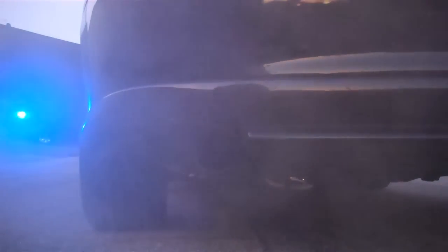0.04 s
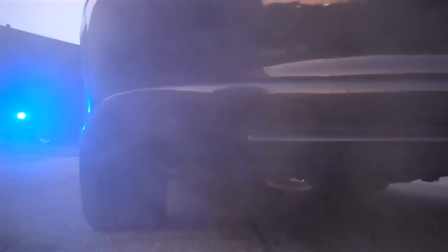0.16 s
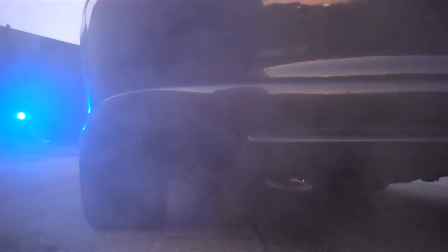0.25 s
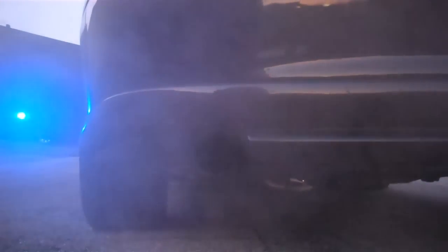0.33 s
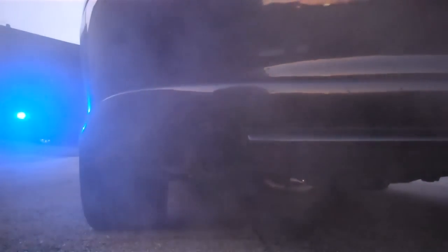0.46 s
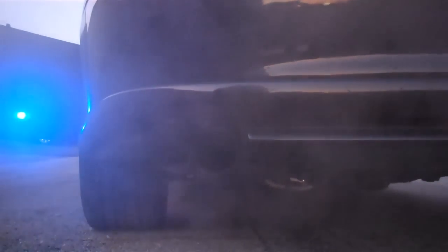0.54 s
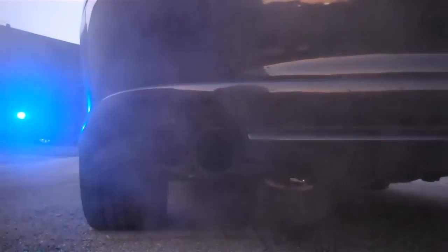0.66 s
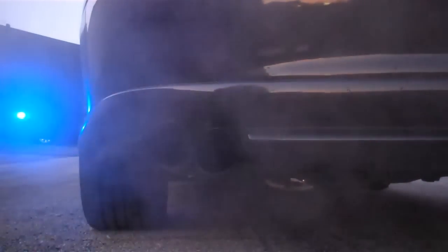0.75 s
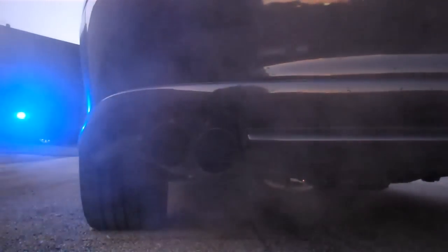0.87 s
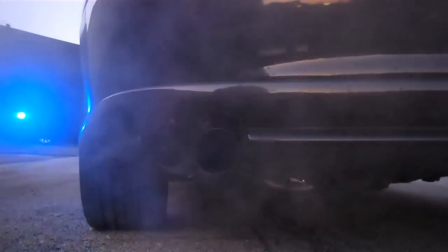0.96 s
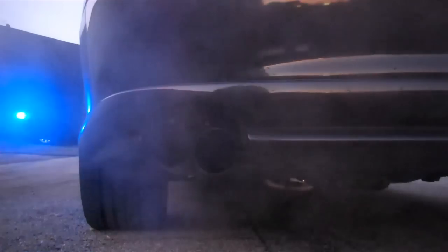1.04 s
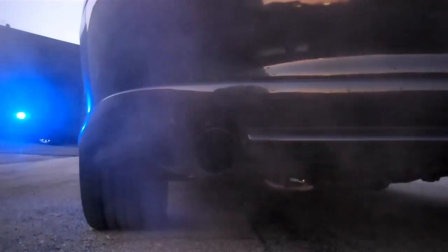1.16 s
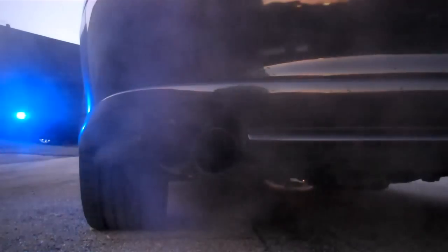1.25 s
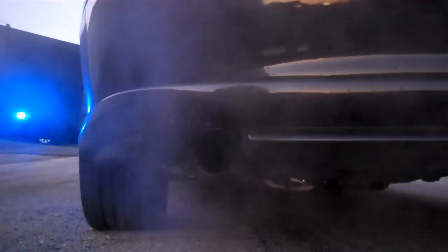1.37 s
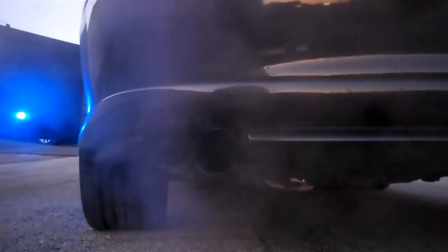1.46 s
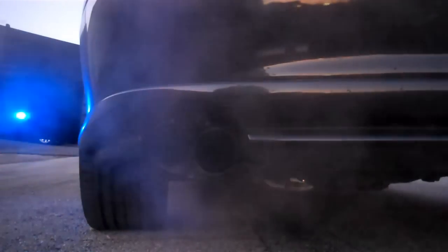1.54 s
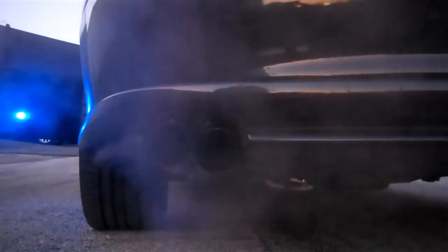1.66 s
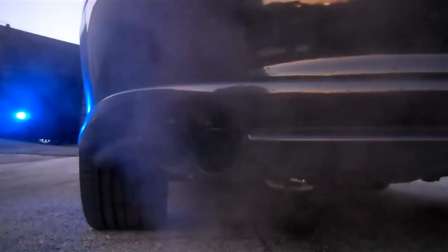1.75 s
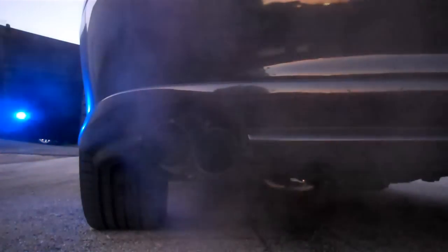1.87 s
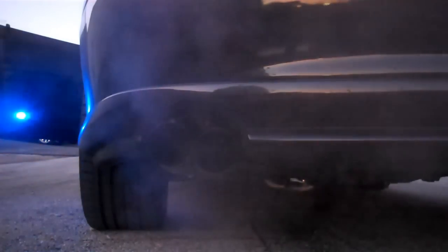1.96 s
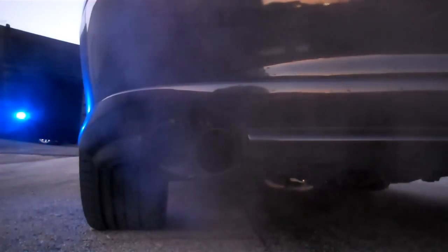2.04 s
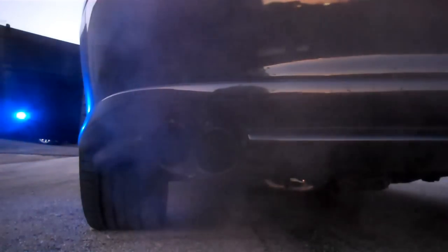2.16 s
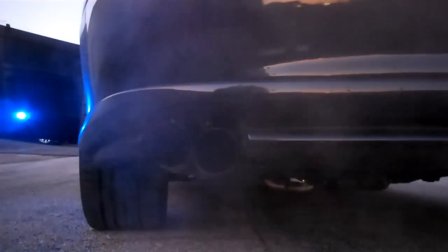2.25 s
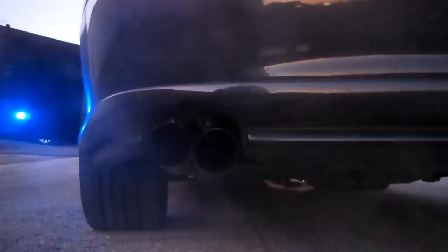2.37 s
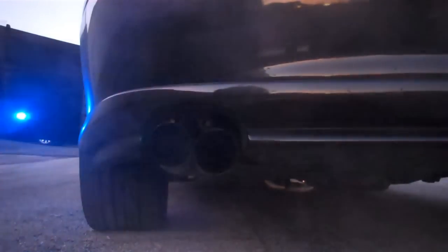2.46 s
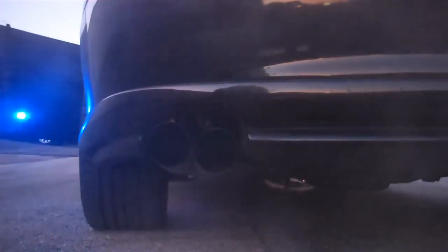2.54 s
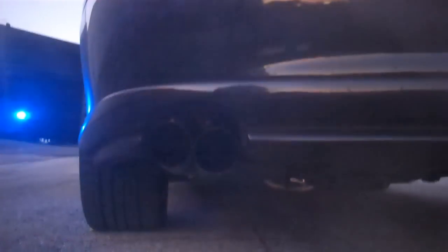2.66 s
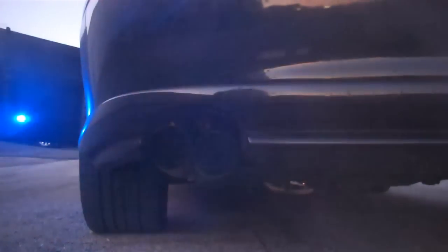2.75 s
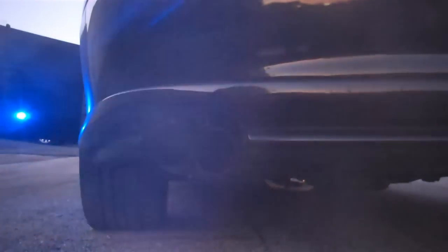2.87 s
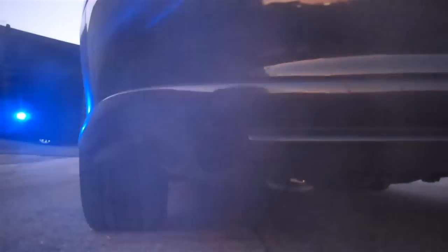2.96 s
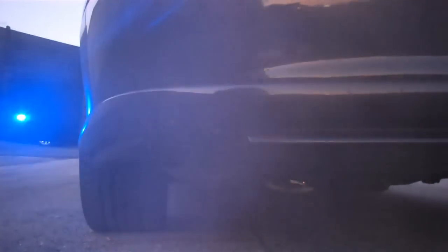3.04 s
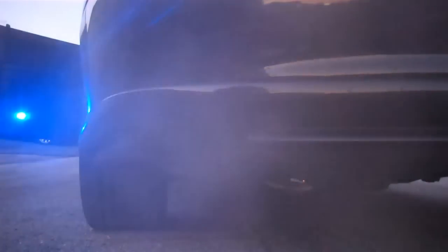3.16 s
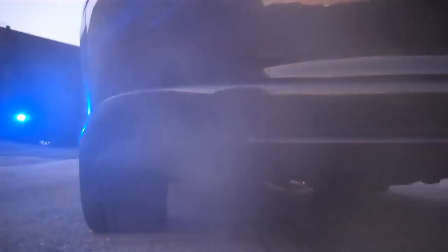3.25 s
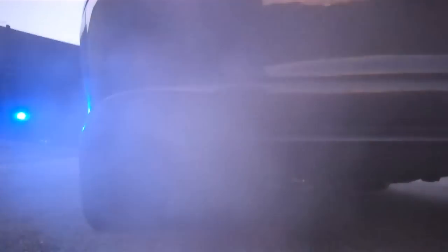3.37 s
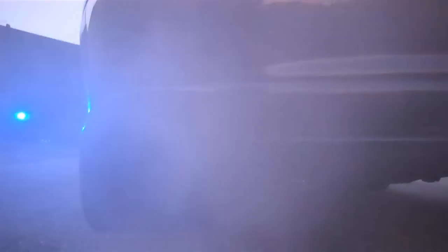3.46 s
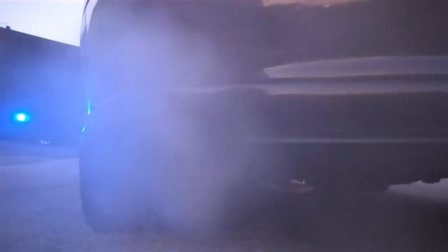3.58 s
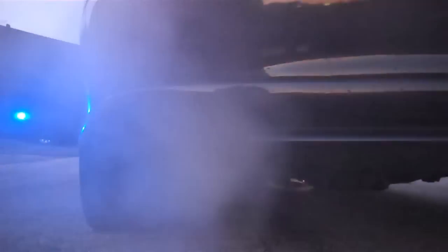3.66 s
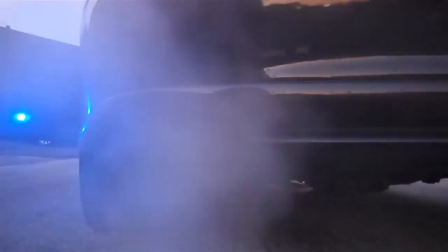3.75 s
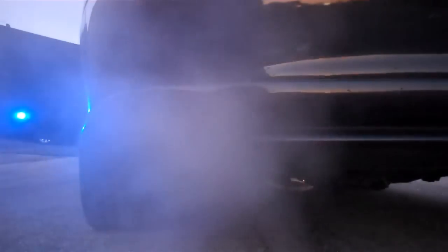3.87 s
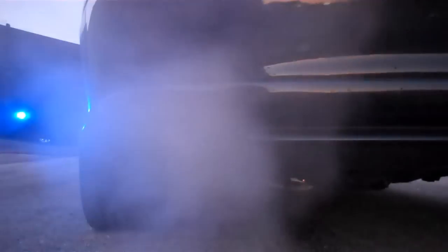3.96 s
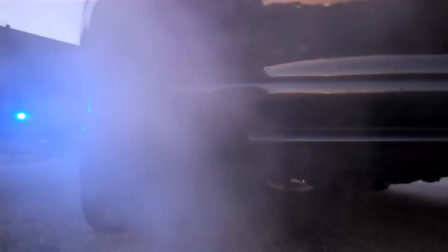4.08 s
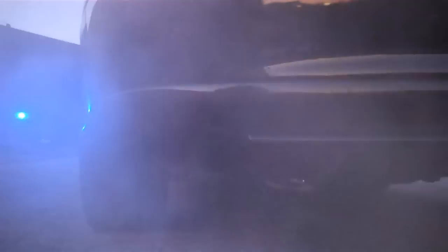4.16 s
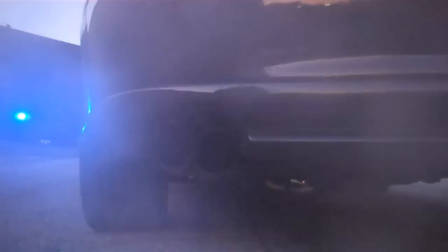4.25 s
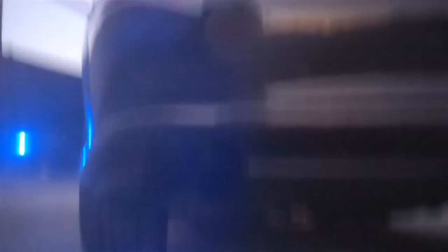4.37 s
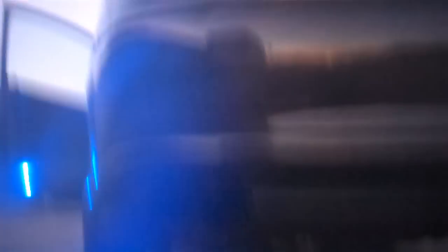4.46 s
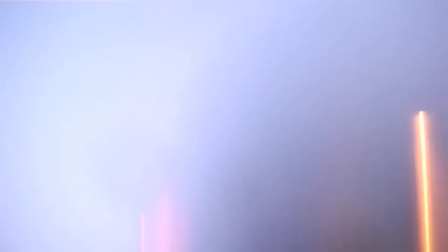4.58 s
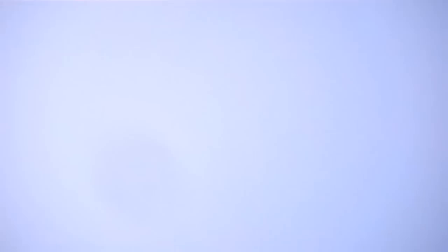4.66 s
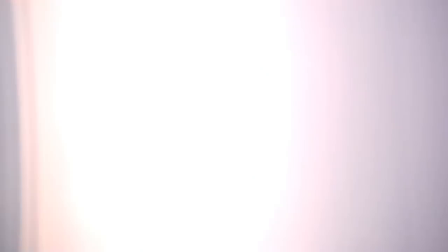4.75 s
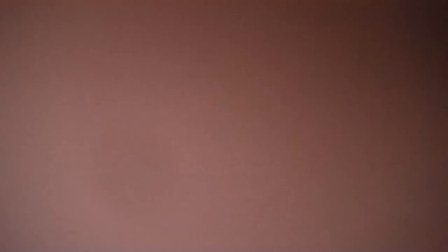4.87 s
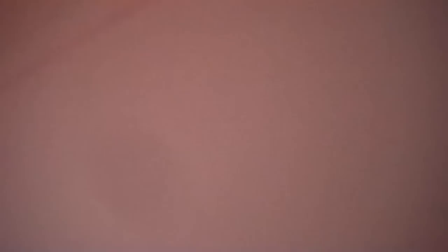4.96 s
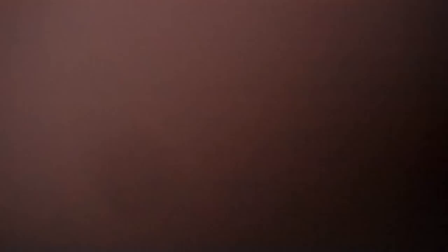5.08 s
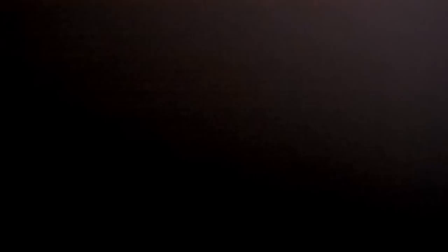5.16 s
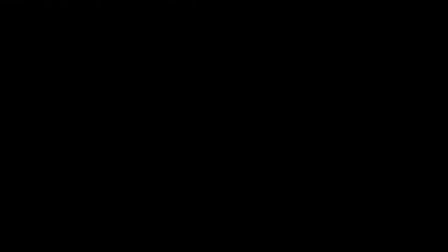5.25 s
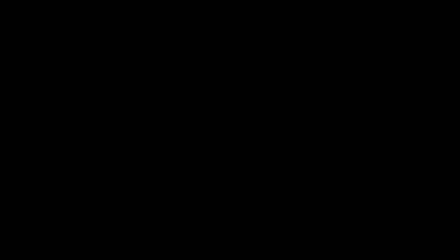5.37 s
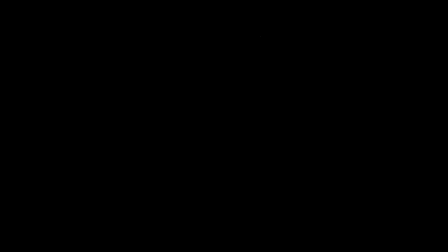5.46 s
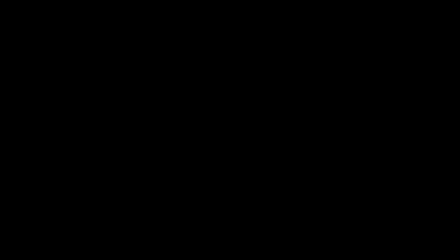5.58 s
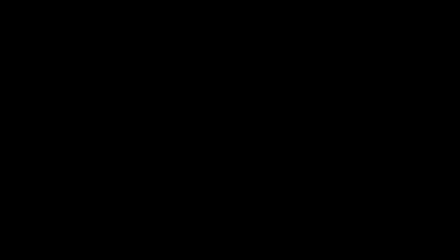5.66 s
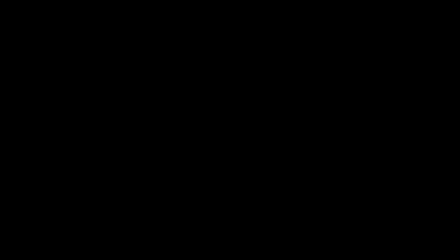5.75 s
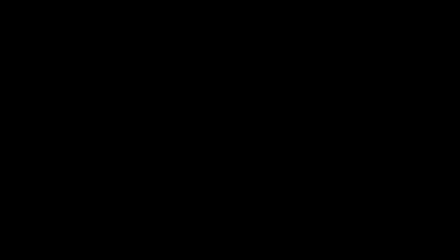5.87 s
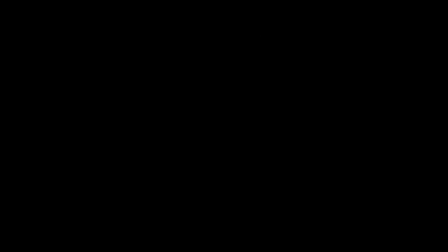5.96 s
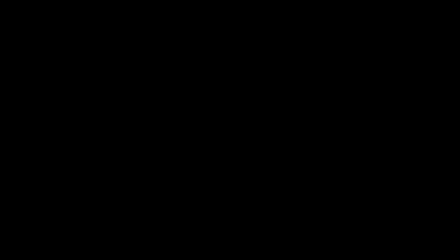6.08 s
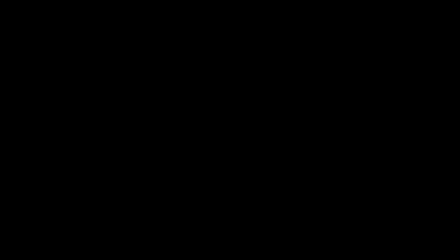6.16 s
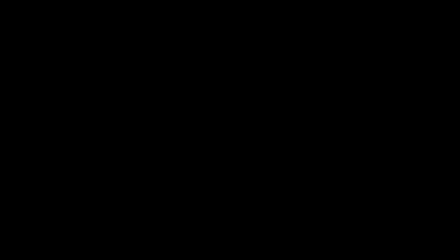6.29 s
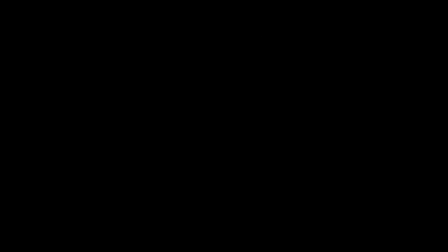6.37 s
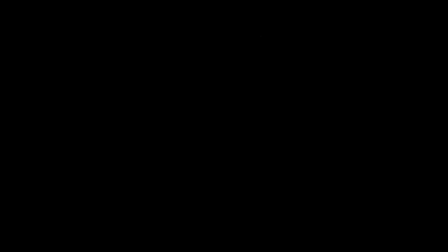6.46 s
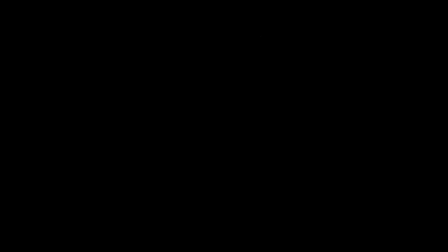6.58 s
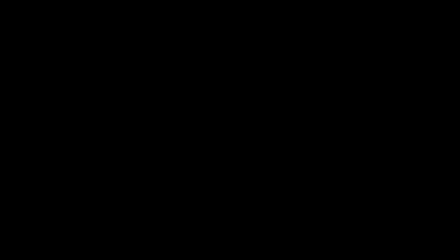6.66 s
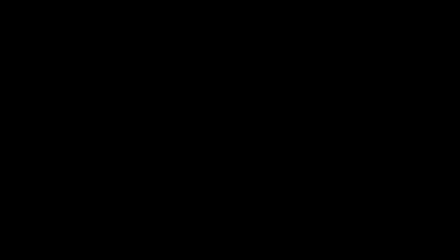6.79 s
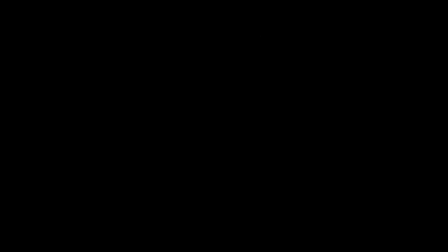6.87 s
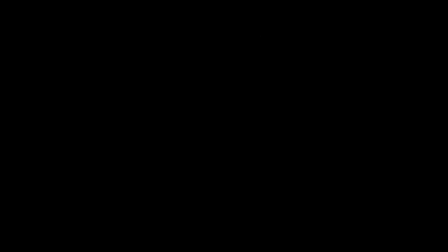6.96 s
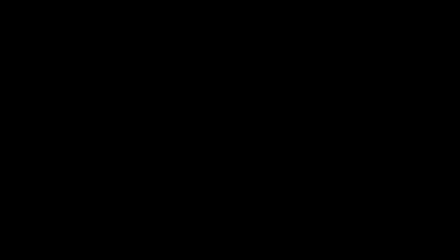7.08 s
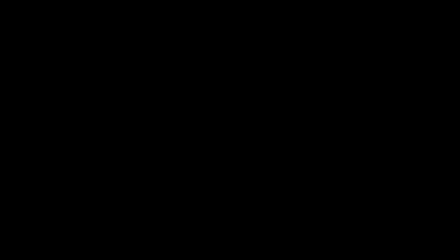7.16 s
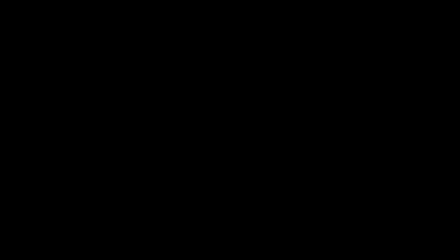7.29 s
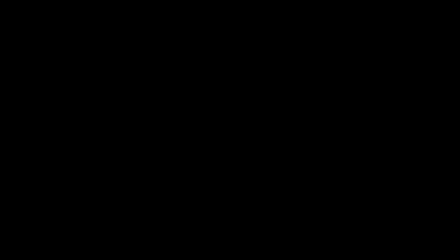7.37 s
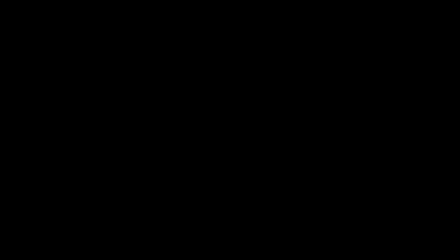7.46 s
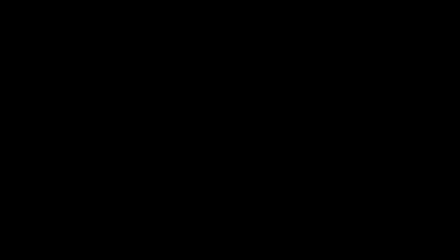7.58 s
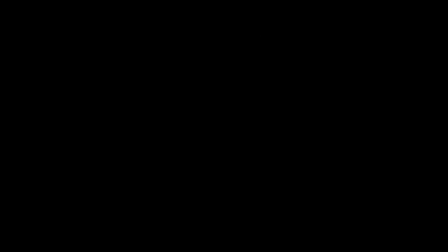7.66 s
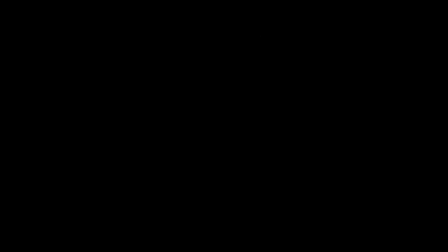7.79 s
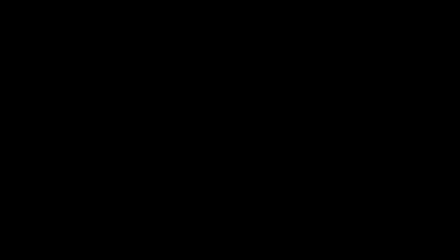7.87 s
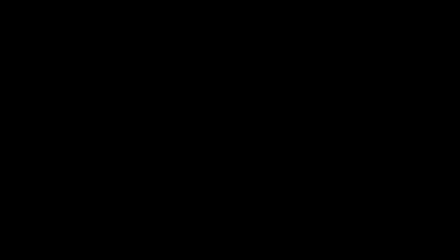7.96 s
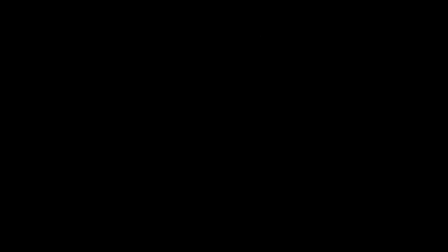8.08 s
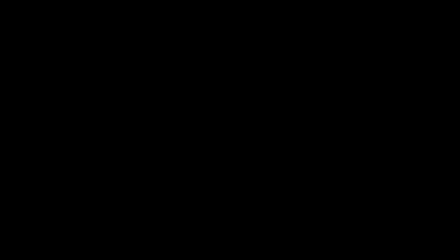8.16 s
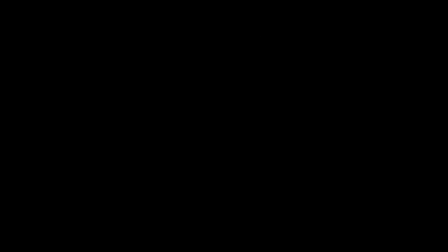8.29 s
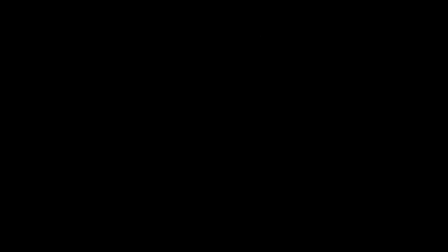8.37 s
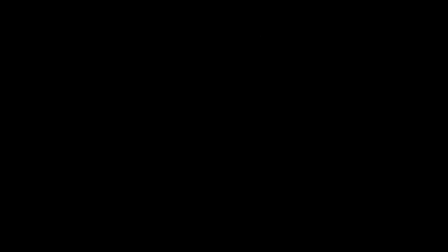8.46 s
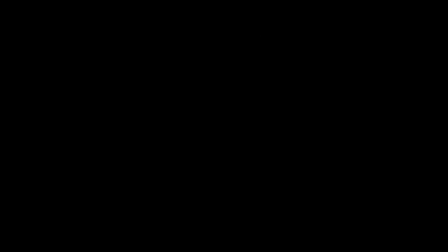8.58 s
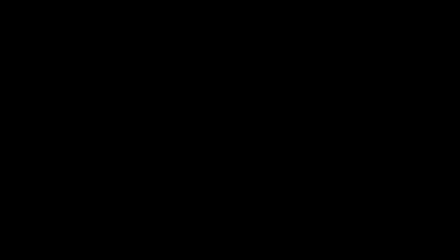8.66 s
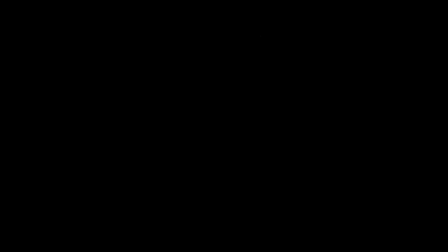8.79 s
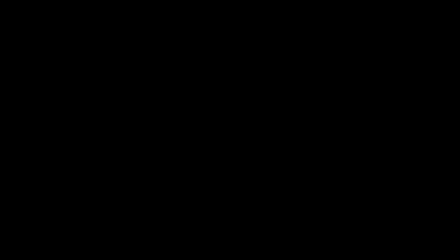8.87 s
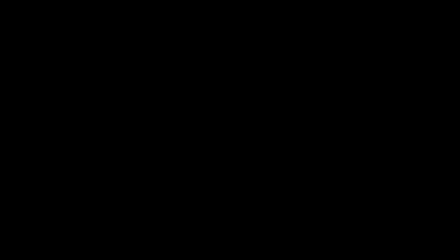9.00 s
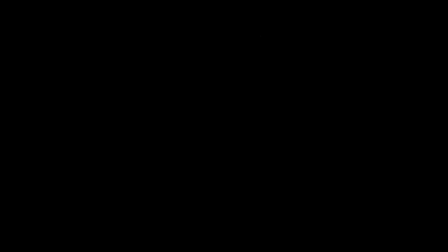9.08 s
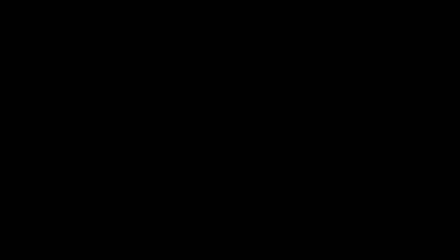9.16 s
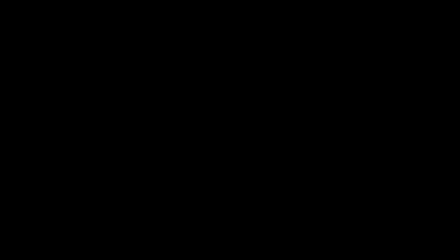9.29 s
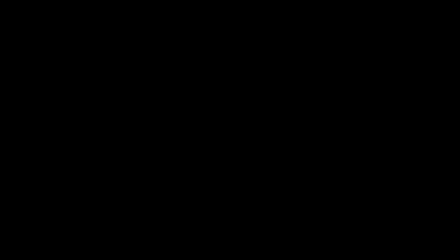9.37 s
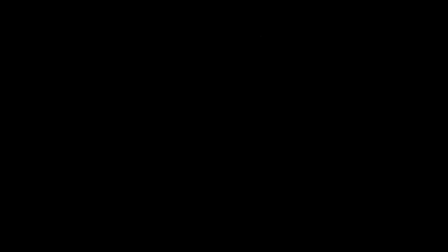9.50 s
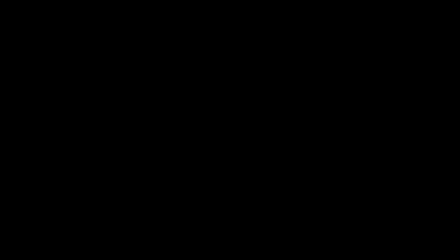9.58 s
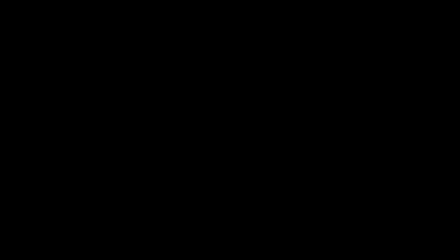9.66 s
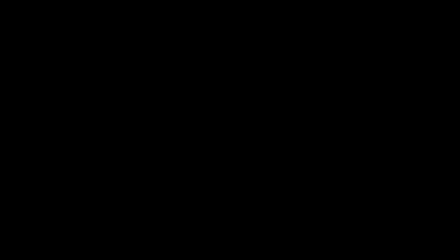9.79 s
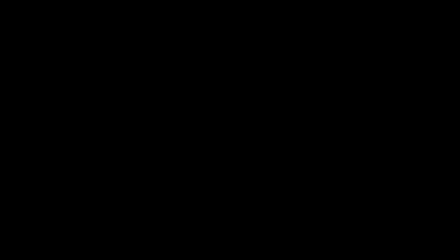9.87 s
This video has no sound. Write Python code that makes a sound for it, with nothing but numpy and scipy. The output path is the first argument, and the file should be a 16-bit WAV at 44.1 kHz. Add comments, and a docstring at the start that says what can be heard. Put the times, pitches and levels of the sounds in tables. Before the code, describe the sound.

Right behind a car outdoors, a loping V8 exhaust chugs under a steady hiss and thin whine. One short rev burbles away, then two loud, snarling revs follow, the second higher. Air thumps the microphone and fingers knock against it. The pitch sinks slowly through burbles and a single backfire crack, and the idle returns, sounding farther off.

```python
"""A V8 idles lumpily, heard right at its tailpipes: one puff per firing rings the exhaust pipes.
It is blipped once, revved hard in two pushes, then chugs and burbles back to idle, backfiring once.
Hiss, a thin whine and a chirping belt ride on top. Air buffets the microphone, which is picked up
with a few knocks; its gain control ducks under each rev."""
import sys
import numpy as np
from scipy import signal
from scipy.fft import rfft, irfft, next_fast_len
from scipy.io import wavfile
from scipy.ndimage import uniform_filter1d, map_coordinates

SR = 44100
rng = np.random.default_rng(int(sys.argv[2]) if len(sys.argv) > 2 else 0)


def bounce(signal):
    """Save signal as a 16-bit WAV file at the path given by the first command-line argument."""
    frames = np.transpose(np.atleast_2d(signal))
    limited = np.clip(frames, -1, 1)
    pcm = np.round(limited * 32767).astype(np.int16)
    wavfile.write(sys.argv[1], SR, pcm)


N = 437913
TIME_S = np.arange(N) / SR
IDLE_HZ = 53.25  # firing rate
FAR_BARK, FAR_RASP = 0.8, 0.36  # dB lost per dB of boom lost with distance

# cylinders in firing order: strength_db, lag_firings
CYLINDERS = [(-3.7, 0.29), (-3.7, 0.26), (-1.8, 0.35), (-4.3, 0.37), (-3.6, 0.3), (-5.6, 0.41), (0.5, 0.28),
             (-8.0, 0.4)]
# exhaust voice by speed: firing_hz, boom_db, bark_db, rasp_db, note_db
EXHAUST_VOICE = [(54, -13, -22.5, -28.5, -36), (66.6, -14, -24, -27.5, -35.5),
                 (88, -5.5, -16.5, -26.5, -20), (125.5, -6, -14, -23.5, -10), (142.7, -10, -11, -21, -8.5),
                 (177.4, -1.5, -14.5, -16, -38), (194.8, -6.5, -15, -18.5, -11),
                 (260.5, -18, -10.5, -17, -2), (288, -14.5, -15.5, -16.5, -4),
                 (327.7, -19.5, -12.5, -18, -2.5), (380, -14.5, -14, -20.5, -14)]
# throttle stabs: start_s, cut_s, boom_gain_db, bark_rasp_gain_db, steam_db
THROTTLE_STABS = [(2.095, 2.229, 6.5, -0.5, -30), (3.998, 4.143, 3, 6.5, -23.5)]
# spectrum of backfire crack and handling scrape: freq_hz, level_db
CRACK_SPECTRUM = [(150, 9), (500, 9), (1500, 1), (3000, -6), (5500, -7), (8000, -11), (13500, -25),
                  (15500, -45)]


def amp(db):
    """Decibels to gain."""
    return 10 ** (np.asarray(db) / 20)


def unit(x):
    """Scale to rms 1."""
    return x / np.sqrt(np.mean(x ** 2) + 1e-20)


def along(points, hz):
    """Read (freq_hz, value) points on a log axis."""
    f, v = np.transpose(points)
    return np.interp(np.log(hz + 1), np.log(f + 1), v)


def lookup(rows, at):
    """Interpolate the later columns against the first."""
    axis, *columns = np.transpose(rows)
    return [np.interp(at, axis, column) for column in columns]


def wobble(rate_hz):
    """Smooth random curve."""
    knots = rng.standard_normal(int(N * rate_hz / SR) + 4)
    return map_coordinates(knots, [np.arange(N) * rate_hz / SR])


def bump(centre_s, half_width_s):
    """Gaussian envelope, peak 1."""
    return np.exp(-((TIME_S - centre_s) / half_width_s) ** 2)


def filtered(x, response):
    """Apply a complex frequency response."""
    size = next_fast_len(N + SR // 2)
    return irfft(rfft(x, size) * response(np.fft.rfftfreq(size, 1 / SR)), size)[..., :N]


def below(x, edge):
    """Steep roll-off from 1 to 0 at the edge."""
    return 1 / (1 + (x / edge) ** 12)


def above(x, edge):
    """Steep rise from 0 to 1 at the edge."""
    return 1 - below(x, edge)


def resonances(rows, f):
    """Causal response of modes: centre_hz, width_hz, gain_db."""
    return sum((-1) ** k * amp(db) * 1j * f * width / (hz * hz - f * f + 1j * f * width)
               for k, (hz, width, db) in enumerate(rows))


def noise(spectrum, side_db):
    """Coloured stereo noise, mid at rms 1."""
    white = rng.standard_normal((2, N))
    mid, side = filtered(white, lambda f: amp(along(spectrum, f)) * above(f, spectrum[0][0] * 0.97))
    return (mid + amp(side_db) * np.array([side, -side])) / mid.std()


def bursts(rows, tail):
    """Envelope of short holds with decaying tails: start_s, level_db, length_s."""
    t, envelope = np.arange(SR // 3) / SR, np.zeros(N + SR)
    for start_s, db, length_s in rows:
        shape = below(t, length_s) + tail * np.exp(-t / (3.8 * length_s))
        envelope[round(start_s * SR):][:len(t)] += amp(db) * shape
    return envelope[:N]


def impulses(when, size, fired):
    """Pulses placed between samples at the given firing counts."""
    at = np.interp(when, fired, np.arange(N))
    whole = at.astype(int)
    early = np.bincount(whole, size * (1 + whole - at), N + 1)
    late = np.bincount(whole + 1, size * (at - whole), N + 1)
    return (early + late)[:N]


def per_cycle(x, fired, firings=len(CYLINDERS)):
    """Scale to rms 1 over a sliding window of firings, keeping the throb inside it."""
    start, end = (np.interp(fired + step, fired, np.arange(N)).astype(int)
                  for step in (-firings / 2, firings / 2))
    energy = np.cumsum(x ** 2)
    return x / np.sqrt((energy[end] - energy[start]) / (end - start) + 1e-20)


def yard(x):
    """Ground and walls return a short diffuse tail."""
    # reverberation: freq_hz, t60_s
    decay = [(150, 0.24), (1500, 0.14), (10000, 0.046)]
    hz, t, spectra = signal.stft(rng.standard_normal((2, SR // 3)), SR, nperseg=256)
    tail = signal.istft(spectra * amp(-60 * t / along(decay, hz)[:, None]), SR, nperseg=256)[1]
    return signal.fftconvolve(x, tail / np.linalg.norm(tail[0]), axes=1)[:, :N]


def ticks():
    """Small dry clicks in the final idle."""
    # clicks: start_s, relative_db
    clicks = [(9.5087, -27.5), (9.553, -29.5), (9.6233, -25), (9.6898, -33)]
    envelope = bursts([(s, db - 6.5, .002) for s, db in clicks], tail=0.59)
    return envelope * noise([(1500, -14), (3500, -5.5), (6000, -31), (12000, -55.5)], side_db=-9)


def buffet():
    """Lumps of gas hit the microphone, most as it is snatched up."""
    # buffet strength: time_s, level_db
    strength = [(2, -51), (2.7, -34), (4.2, -39.5), (4.26, -15.5), (4.54, -12.5), (4.62, -24), (5.8, -37.5),
                (6.7, -37.5), (7.1, -35.5), (9, -39)]
    db, = lookup(strength, TIME_S)
    rumble = noise([(25, -16.5), (45, -14.5), (80, -15), (200, -44), (1000, -99.5)], side_db=-1.5)
    return amp(db) * unit(rumble * amp(3.3 * wobble(14)))


def handling():
    """Fingers knock and scrape, ringing the microphone's housing over a soft thud."""
    # finger knocks: start_s, level_db, length_s
    knocks = [(4.353, -18.5, 0.0095), (4.53, -17.5, 0.0072), (4.838, -4.5, 0.0063), (4.851, -8, .012),
              (4.883, -20.5, 0.0052), (5.064, -6.5, .01), (5.129, -6, .011), (5.141, -19.5, 0.02),
              (5.174, -16, .006), (5.222, -18, .004), (5.258, -16.5, .002)]
    # housing modes: centre_hz, width_hz, gain_db
    housing = [(1110, 100, 5), (1410, 90, 4), (2350, 120, 3), (5670, 300, 7)]
    envelope = bursts(knocks, tail=0.16)
    scrape = envelope * unit(noise(CRACK_SPECTRUM, side_db=-4) * amp(3 * wobble(900)))
    thud = filtered(envelope, lambda f: below(f, 320) * above(f, 190))
    return scrape + filtered(scrape, lambda f: resonances(housing, f)) + amp(12) * thud


def whine():
    """Narrow fuzzy tones, first idle only."""
    # tones: pitch_hz, width_hz, level_db
    bands = [(1490, 37, -47.5), (1602, 70, -45)]
    tones = 0
    for hz, width_hz, db in bands:
        phase = 2 * np.pi * hz * TIME_S
        tones += amp(db) * (wobble(width_hz) * np.cos(phase) + wobble(width_hz) * np.sin(phase))
    return tones * np.interp(TIME_S, [1.95, 2.1], [1, 0])


def belt(firing_hz, fired, unshaded):
    """One arching squeak per pulley turn, on the left; fades as the engine speeds up."""
    grip_hz, fade_db_per_hz, shade_db = 75.6, 1.5, -14.5
    db = -39 + shade_db * (1 - unshaded) - fade_db_per_hz * np.maximum(firing_hz - grip_hz, 0)
    pulley = np.cos(2 * np.pi * fired * .26)
    pitch_hz = 7900 + 550 * pulley + 300 * wobble(22) + 270 * wobble(1100)
    envelope = amp(12 * pulley + 3 * wobble(16) + 3 * wobble(500))
    chirps = unit(np.sin(2 * np.pi * np.cumsum(pitch_hz) / SR) * envelope)
    return amp(db) * chirps * amp([[9], [-14]])


def hiss(fired, level_db, unshaded):
    """Hiss that flutters with the firings and dulls once the microphone is lifted away."""
    # direct spectrum: freq_hz, level_db
    bright = [(700, 6), (1400, -5.5), (2200, -2.5), (4200, -2), (5200, -3.5), (6400, 0.5), (7800, -0.5),
              (9000, -10.5), (10500, -25.5), (14000, -41.5)]
    # shaded spectrum: freq_hz, level_db
    shaded = [(700, 1.5), (1600, -4), (2500, -3.5), (3200, -4), (3900, 0.5), (5000, -6), (6200, -1),
              (7200, -15.5), (8600, -15.5), (10000, -40.5), (14000, -47.5)]
    # stereo balance: freq_hz, left_minus_right_db
    lean = [(2400, 0), (4300, -4), (8000, 3.5), (14000, 35.5)]
    direct = np.sqrt(unshaded) * noise(bright, side_db=-10.5) * amp(3)
    dull = np.sqrt(1 - unshaded) * noise(shaded, side_db=-4) * amp(-1.5)
    air = filtered(direct + dull, lambda f: amp(np.outer([.5, -.5], along(lean, f))))
    return air * amp(level_db + 0.53 * np.cos(2 * np.pi * fired) + wobble(60))


def stab_envelopes():
    """Each throttle stab swells from 0 to 1 and is cut short."""
    rise_s, fall_s = 0.054, 0.0056
    return np.array([np.interp(TIME_S, [start_s, start_s + rise_s, cut_s, cut_s + fall_s], [0, 1, 1, 0])
                     for start_s, cut_s, *_ in THROTTLE_STABS])


def steam():
    """Bright rush of vapour at each throttle stab."""
    swell = amp(np.array(THROTTLE_STABS)[:, -1]) @ stab_envelopes() ** 2
    return swell * noise([(900, 2), (4000, -9), (7000, 2), (10000, -13), (14000, -20.5)], side_db=-13.5)


def burbles():
    """Unburnt fuel pops on the overrun, muffled by the silencer."""
    # pops: start_s, level_db
    pops = [(2.695, -33), (2.806, -22), (2.846, -18.5), (3.124, -25), (6.85, -15), (6.953, -17.5),
            (6.996, -33), (7.618, -15), (7.658, -18), (7.794, -15), (8.326, -20.5)]
    envelope = bursts([(s, db, 0.0058) for s, db in pops], tail=0.77)
    gas = noise([(260, 8), (450, 6.5), (750, -6.5), (1100, -27.5)], side_db=-23)
    return filtered(envelope * gas, lambda f: below(f, 950))


def backfire():
    """One steep pressure front cracks and rings the tailpipe."""
    # tailpipe modes: pitch_hz, level_db, t60_s
    tailpipe = [(228, -0.5, 0.028), (400, -3, 0.018), (870, -4, 0.0098), (1400, -3, 0.008),
                (2600, -6, 0.0072), (6130, -10, 0.004), (11000, -15, .003)]
    start_s, crack_t60_s = 7.4647, .022
    t = np.maximum(TIME_S - start_s, 0)
    ring = sum(amp(db - 60 * t / t60_s) * np.sin(2 * np.pi * hz * t) for hz, db, t60_s in tailpipe)
    crack = (t > 0) * amp(-12 - 60 * t / crack_t60_s) * noise(CRACK_SPECTRUM, side_db=-10)
    return amp(6.5) * (ring + crack)


def chuffs(firing_hz, fired, far_db):
    """Hollow coughs, sinking in pitch, give the idle its lope."""
    # coughs in each engine cycle: place_cycles, start_hz, end_hz, level_db
    coughs = [(.21, 490.3, 467, -30), (.68, 533, 300.8, -26.5), (.96, 225, 204.8, -24)]
    half_width_cycles = 0.0885
    cycle, out = fired / len(CYLINDERS), 0
    for place, start_hz, end_hz, db in coughs:
        offset = ((cycle - place + .5) % 1 - .5) / half_width_cycles
        pitch_hz = np.interp(offset, [-1, 1], [start_hz, end_hz]) * (1 + .08 * wobble(120))
        envelope = amp(db + 2.7 * wobble(7.6)) * np.exp(-offset ** 2)
        out += envelope * np.sin(2 * np.pi * np.cumsum(pitch_hz) / SR)
    return out * amp(FAR_BARK * far_db + 3.5) * np.interp(firing_hz, [IDLE_HZ, 62], [1, 0])


def engine_speed():
    """Firing rate in Hz: climbs under throttle, coasts against friction, smoothed by the flywheel."""
    # throttle pushes: start_s, end_s, top_hz, ease_fraction
    revs = [(2.077, 2.515, 151, 0), (4.033, 4.565, 308, .06), (5.189, 5.557, 375, .25)]
    # friction: firing_hz, loss_hz_per_s
    drag = [(IDLE_HZ, 0), (59, 23), (80, 53), (130, 59), (175, 108), (330, 140)]
    inertia_s = .1
    falling_hz = np.linspace(400, IDLE_HZ + .05, 2000)
    elapsed_s = np.cumsum((falling_hz[0] - falling_hz[1]) / lookup(drag, falling_hz)[0])
    firing_hz = np.full(N, IDLE_HZ)
    for start_s, end_s, top_hz, ease in revs:
        u = np.clip((TIME_S - start_s) / (end_s - start_s), 0, 1)
        climb = np.interp(u + ease * u * (1 - u), [0, 1], [firing_hz[round(start_s * SR)], top_hz])
        coast_s = TIME_S - end_s + np.interp(-top_hz, -falling_hz, elapsed_s)
        coast = np.interp(coast_s, elapsed_s, falling_hz)
        firing_hz = np.where(TIME_S < start_s, firing_hz, np.where(TIME_S < end_s, climb, coast))
    return uniform_filter1d(firing_hz, round(inertia_s * SR), mode="nearest")


def throttle():
    """Level and puff scatter added by the open throttle, in dB."""
    # open throttle: open_s, shut_s, blast_db, strain_db
    blasts = [(2.084, 2.362, 4.5, 2), (3.927, 4.53, 3.5, 1.5), (5.187, 5.574, 3, 0.5)]
    opening_s, shutting_s = 0.084, 0.01
    added_db = 0
    for open_s, shut_s, *gains_db in blasts:
        corners_s = [open_s, open_s + opening_s, shut_s, shut_s + shutting_s]
        added_db += np.outer(gains_db, np.interp(TIME_S, corners_s, [0, 1, 1, 0]))
    return added_db


def lulls():
    """Brief dips and a few small lifts where the load changes, in dB."""
    # level changes: centre_s, gain_db, half_width_s
    changes = [(2.019, 1.5, 0.016), (2.244, -6.5, 0.019), (2.41, 2.5, 0.045), (3.323, -4.5, 0.045),
               (4.589, -10, 0.018), (5.112, -5.5, 0.015), (5.199, -10, 0.021), (5.61, 4, 0.022),
               (8.175, -3.5, .018)]
    return sum(db * bump(s, width_s) for s, db, width_s in changes)


def surges():
    """Brief swells and sags in dB: one curve for boom, one for bark and rasp."""
    # exhaust surges: centre_s, boom_gain_db, bark_rasp_gain_db, half_width_s
    swells = [(2.214, -2.5, 5.5, 0.011), (2.45, -10, -4.5, 0.15), (2.62, 11.5, -3.5, 0.021),
              (2.83, 2, 5, 0.026), (3.118, -2, 7, 0.013), (4.21, -18, -1.5, .05), (5.03, 12, -0.5, 0.075),
              (5.26, -4, -4, .06), (5.645, 8.5, 7, 0.021), (5.73, -9.5, 5, 0.054), (6.87, 2, 5.5, 0.055),
              (7.645, -4, 6, 0.063), (8.346, -1.5, 5.5, .033)]
    # overrun chugs: centre_s, boom_gain_db
    chugs = [(2.94, 6), (2.99, 2.5), (3.119, 7.5), (3.275, 6.5), (3.45, 5.5), (3.55, 4.5), (3.78, 5),
             (3.86, 7), (7.72, 6.5), (7.78, 5.5), (8.061, 6.5), (8.26, 3.5), (8.335, 4.5), (8.47, 3),
             (8.59, 4)]
    swell_db = sum(np.outer(gains, bump(s, width_s)) for s, *gains, width_s in swells)
    chug_db = sum(db * bump(s, half_width_s=0.029) for s, db in chugs)
    stab_db = np.array(THROTTLE_STABS)[:, 2:4].T @ stab_envelopes()
    return swell_db + np.outer([1, 0], chug_db) + stab_db


def exhaust_levels(firing_hz, fired, blast_db, far_db):
    """Boom, bark and rasp in dB, from speed, throttle, surges, distance and idle throb."""
    boom_db, bark_db, rasp_db, _ = lookup(EXHAUST_VOICE, firing_hz)
    low_db, high_db = surges()
    idling = np.interp(firing_hz, [IDLE_HZ, 75], [1, 0])
    throb = idling * np.cos(2 * np.pi * (fired / len(CYLINDERS) - 0.95))  # once per engine cycle
    return (boom_db + 0.73 * blast_db + low_db + far_db + 0.74 * throb,
            bark_db + blast_db + high_db + FAR_BARK * far_db + 4.5 * throb,
            rasp_db + 1.98 * blast_db + high_db + FAR_RASP * far_db)


def firing_note(firing_hz, fired, far_db):
    """Tone at the firing rate; uneven cylinders add a throaty chord, stronger at speed."""
    # note swells under throttle: start_s, end_s, level_db
    swells = [(2.222, 2.366, -1.5), (4.047, 4.136, 0.5), (4.122, 4.26, -6.5), (4.368, 4.512, -15.5),
              (5.21, 5.577, -9)]
    # chord: engine_cycle_multiple, level_db
    overtones = [(9, -20), (10, -19), (11, -21), (12, -19), (13, -22), (15, -21), (16, -21), (21, -28),
                 (23, -27), (24, -24), (31, -33)]
    rise_s, decay_s, jitter_rad, waver_db = 0.055, 0.0059, .034, 2.5
    size = amp(lookup(EXHAUST_VOICE, firing_hz)[-1])
    for start_s, end_s, db in swells:
        rise = np.clip((TIME_S - start_s) / rise_s, 0, 1)
        size += amp(db) * rise * np.exp(-np.maximum(TIME_S - end_s, 0) / decay_s)
    phase = 2 * np.pi * fired + 0.057 * wobble(45)
    chord = 0
    for multiple, db in overtones:
        gain = amp(db + waver_db * wobble(6))
        cycle_phase = phase / len(CYLINDERS) + jitter_rad * wobble(110)
        chord += gain * np.sin(multiple * cycle_phase + rng.uniform(0, 2 * np.pi))
    chord_gain = amp(-1.5) * np.interp(firing_hz, [150, 260], [.3, 1])
    return size * amp(far_db) * np.sqrt(2) * (np.sin(phase) + chord_gain * chord)


def puffs(firing_hz, fired, scatter_db):
    """One pulse per firing: uneven cylinders make the lope, chance the burble."""
    # side of the V for each firing: sign
    bank = [1, -1, 1, 1, -1, 1, -1, -1]
    bank_share, evening_out = 0.15, 0.71
    k = np.arange(int(fired[-1]))
    db, lag = np.array(CYLINDERS)[k % len(CYLINDERS)].T
    chance = rng.uniform(-1.27, 1, (len(k), 2))
    scatter = np.interp(k, fired, amp(scatter_db) - 1)
    size = amp(db) * (1 + 1.3 * scatter * chance[:, 0])
    # at speed the even part merges into the note, cylinders grow alike, the near bank is louder
    merged = np.interp(np.interp(k, fired, firing_hz), [58, 110], [0, .88])
    even = amp(db).mean()
    size += merged * (bank_share * np.array(bank)[k % len(bank)] - even - evening_out * (amp(db) - even))
    return impulses(k + lag + .15 * scatter * chance[:, 1], size, fired)


def silencer(x, t60_s):
    """Dense reflections smear each puff and add close, shallow resonances."""
    t = np.arange(SR // 4) / SR
    echoes = rng.standard_normal(len(t)) * amp(-60 * t / t60_s) * (1 - np.exp(-t / .003))
    response = rfft(echoes, 2 * len(t))
    flattened = irfft(response / np.sqrt(np.abs(response)))[:len(t)]
    return signal.fftconvolve(x, flattened)[:N]


def shocks(fired):
    """Each cylinder tears out its own ragged shock train, nearly the same every cycle."""
    # shock spectrum: freq_hz, level_db
    spectrum = [(380, 5), (560, 1), (720, -5), (900, -7.5), (1100, -14.5), (1450, -15.5), (2200, -24.5),
                (4000, -41.5), (9000, -58.5)]
    count, jitter_firings = 5, 0.024
    k = np.arange(int(fired[-1]) - 1)
    cylinder = k % len(CYLINDERS)
    lag, size = rng.random((len(CYLINDERS), count)), rng.standard_normal((len(CYLINDERS), count))
    when = k[:, None] + lag[cylinder] + jitter_firings * rng.standard_normal((len(k), count))
    train = impulses(when.ravel(), size[cylinder].ravel(), fired)
    snarl = filtered(train, lambda f: amp(along(spectrum, f)) * above(f, 370))
    return per_cycle(snarl, fired, firings=4)


def rasp(firing_hz, fired, pulses, smeared, turbulent):
    """Puff edges, breaking into shocks at speed, plus the gust of turbulence behind each puff."""
    # pipe turbulence: freq_hz, level_db
    spectrum = [(250, 19), (480, 5.5), (780, -3), (1100, -22), (1600, -24), (2500, -28.5), (5000, -68.5),
                (12000, -49)]
    gust_decay_s = 0.054
    edge = filtered(smeared, lambda f: amp(along(spectrum, f)) * above(f, 319))
    snarl = shocks(fired) + amp(-3) * np.outer([1, -1], shocks(fired))
    fast = np.interp(firing_hz, [200, 275], [0, 1])
    edge = np.sqrt(1 - fast) * per_cycle(edge, fired) + np.sqrt(fast) * snarl
    gust = filtered(np.abs(pulses), lambda f: 1 / (1 + 2j * np.pi * f * gust_decay_s))
    gas = noise(spectrum, side_db=-33) * per_cycle(gust, fired)
    return np.sqrt(1 - turbulent) * edge + np.sqrt(turbulent) * gas


def pipe(f):
    """Resonant response of the exhaust system."""
    # pipe modes: centre_hz, width_hz, gain_db
    modes = [(42, 9, -15), (107, 17, 4), (130, 21, 2), (217, 24, -8.5), (282, 26, -6), (389, 45, -20),
             (461, 70, -18), (558, 70, -23), (740, 220, -25)]
    return resonances(modes, f)


def boom(firing_hz, pulses):
    """Puffs ring the low pipe modes; little deep bass passes at speed."""
    ring = filtered(pulses, lambda f: pipe(f) * below(f, 162) * (1 - .7 * below(f, 84)))
    return ring - np.interp(firing_hz, [130, 200], [0, .95]) * filtered(ring, lambda f: below(f, 117))


def bark(firing_hz, fired, pulses, smeared):
    """Puffs ring the middle pipe modes, crowding together in the silencer above idle."""
    crowding = np.interp(firing_hz, [55, 90], [0, .75])
    drive = (1 - crowding) * per_cycle(pulses, fired) + crowding * per_cycle(smeared, fired)
    ring = filtered(drive, lambda f: pipe(f) * np.abs(pipe(f)) ** .35 * above(f, 192) * below(f, 440))
    return ring - np.interp(firing_hz, [230, 300], [0, .65]) * filtered(ring, lambda f: below(f, 250))


def exhaust(firing_hz, fired, blast_db, strain_db, far_db):
    """One puff train drives boom, bark and rasp."""
    # unsteady combustion: firing_hz, scatter_db, turbulent_fraction
    unsteady = [(54, .35, .22), (75, 1.6, .35), (130, 1.4, .35), (180, .8, .25), (240, .3, .06)]
    scatter_db, turbulent = lookup(unsteady, firing_hz)
    pulses = puffs(firing_hz, fired, scatter_db + strain_db)
    smeared = silencer(pulses, t60_s=.18)
    boom_db, bark_db, rasp_db = exhaust_levels(firing_hz, fired, blast_db, far_db)
    boom_db += .17 * far_db * wobble(8)  # wavers with distance
    # shorter windows even out the lope: hard firing under load, pipes ringing on in the overrun
    bark_firings = np.interp(blast_db, [0, 4], [len(CYLINDERS), 2])
    boom_firings = np.minimum(bark_firings, np.interp(firing_hz, [58, 75, 150, 200], [8, 3, 3, 8]))
    return (amp(boom_db) * per_cycle(boom(firing_hz, pulses), fired, boom_firings)
            + amp(bark_db) * per_cycle(bark(firing_hz, fired, pulses, smeared), fired, bark_firings)
            + amp(rasp_db) * rasp(firing_hz, fired, pulses, smeared, turbulent))


def scene():
    """Mix driven by engine speed, throttle and microphone position."""
    # arrival as microphone and load shift: time_s, far_db, hiss_db, unshaded_fraction
    arrival = [(0, -1.5, -35, 0.63), (2.1, -2, -34.5, 0.8), (2.36, -2, -40.5, 1), (2.4, -3.5, -50.5, 0.8),
               (2.7, -9, -43.5, 1), (4.0, -3.5, -37, 0.7), (4.6, -6.5, -37.5, 0.94), (5.1, -3.5, -47, 0.9),
               (5.4, -4.5, -37, 0), (5.7, -3, -34, 0.17), (6.4, -1, -32, 0.15), (7.2, -6, -41, 0.02),
               (8.68, -1.5, -38, 0.04), (8.85, -9, -37, 0.02), (9.15, -17, -39, 0),
               (9.93, -13.5, -40, 0.01)]
    far_db, hiss_db, unshaded = lookup(arrival, TIME_S)
    firing_hz = engine_speed()
    fired = np.cumsum(firing_hz) / SR  # running count of firings
    blast_db, strain_db = throttle()
    lull_db = lulls()
    pipes = exhaust(firing_hz, fired, blast_db, strain_db, far_db)
    pipes += firing_note(firing_hz, fired, far_db) + chuffs(firing_hz, fired, far_db)
    pipes = pipes * amp(lull_db) + burbles() + backfire()
    pipes *= amp([[-.35], [.35]])  # slightly right
    pipes += amp(-19) * yard(filtered(pipes, lambda f: 1 - .5 * below(f, 260)))
    air = hiss(fired, hiss_db + blast_db + lull_db, unshaded)
    return (pipes + handling() + buffet() + air + steam() + whine()
            + belt(firing_hz, fired, unshaded) + ticks())


def gain_control(x):
    """Gain drops quickly on loud sound and creeps back."""
    threshold_db, sense_s, clamp_s, recover_db_per_s = -11, 0.035, 0.063, 38.5
    size = round(sense_s * SR)
    power = np.abs(uniform_filter1d(np.mean(x ** 2, axis=0), size, origin=(size - 1) // 2))
    over_db = np.maximum(10 * np.log10(power + 1e-12) - threshold_db, 0)
    creep_db = recover_db_per_s * TIME_S
    cut_db = np.maximum.accumulate(over_db + creep_db) - creep_db
    pole = np.exp(-1 / (clamp_s * SR))
    return x * amp(-signal.lfilter([1 - pole], [1, -pole], cut_db))


def record(dry):
    """Gain control, soft clipping, band limit."""
    top_hz = 14400
    held = gain_control(dry)
    rounded = held / (1 + np.abs(held) ** 8) ** (1 / 8)
    return filtered(rounded, lambda f: f < top_hz)


dry = scene()
out = record(dry)
bounce(out)
```